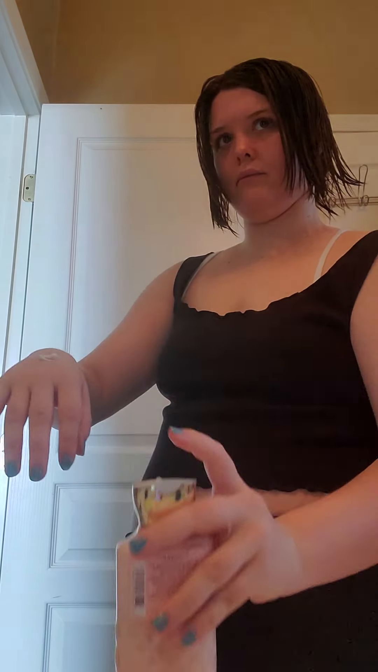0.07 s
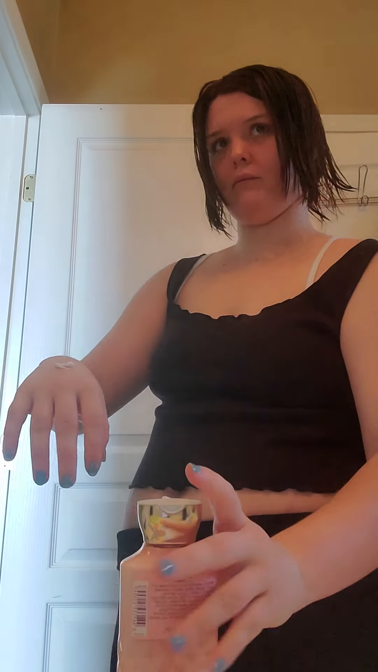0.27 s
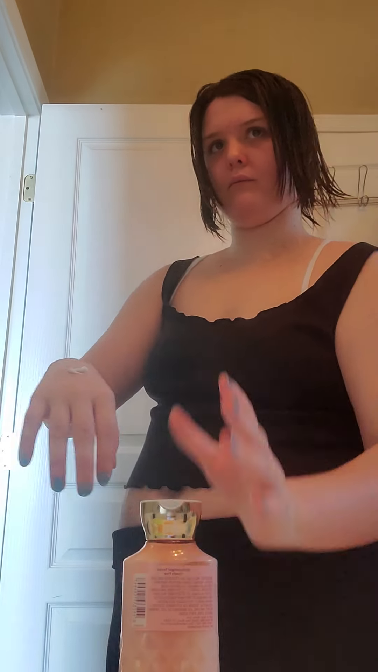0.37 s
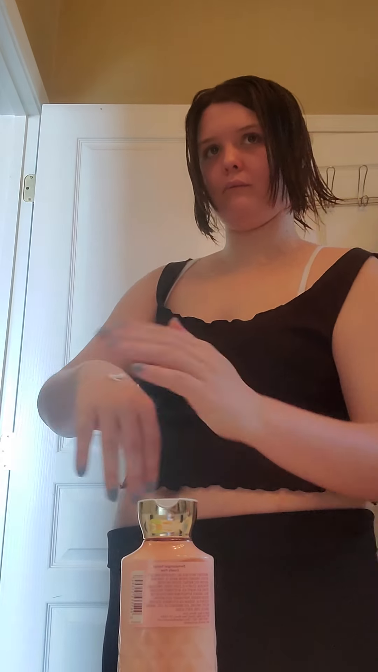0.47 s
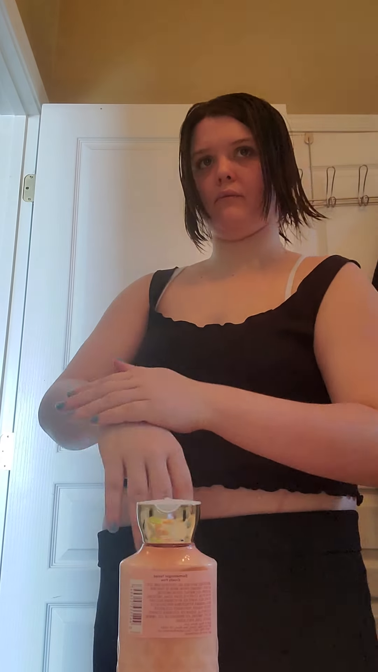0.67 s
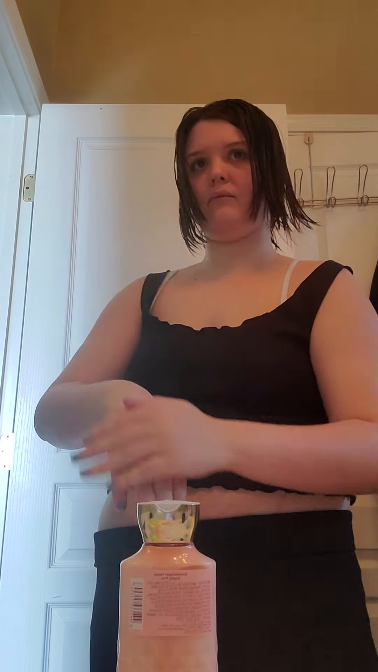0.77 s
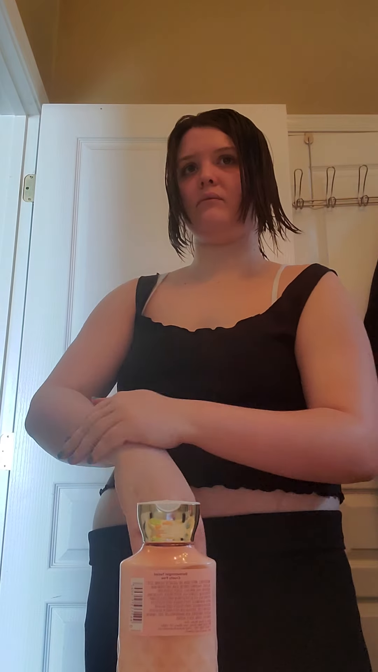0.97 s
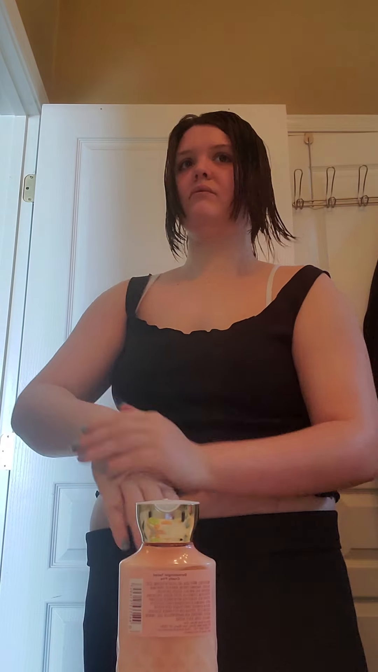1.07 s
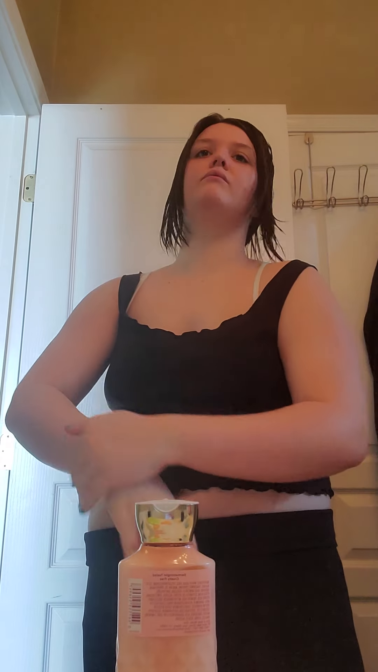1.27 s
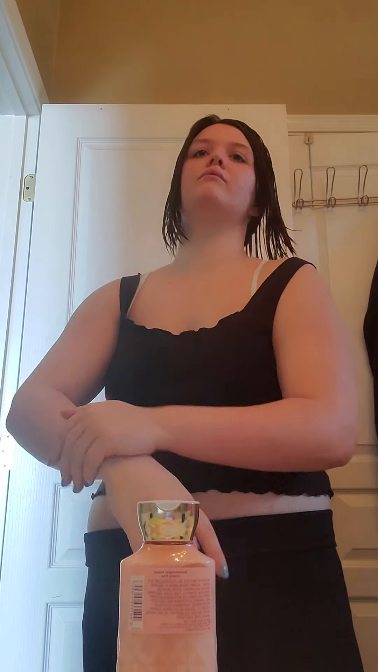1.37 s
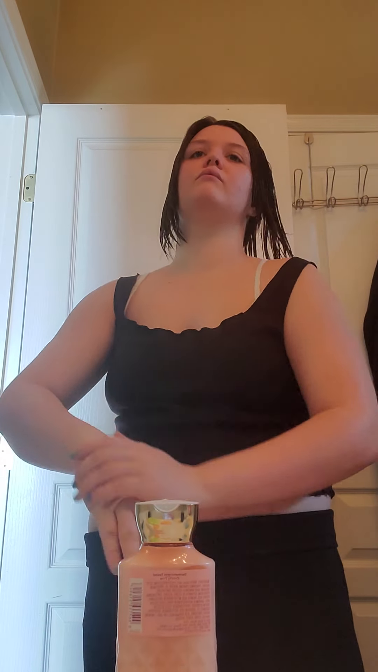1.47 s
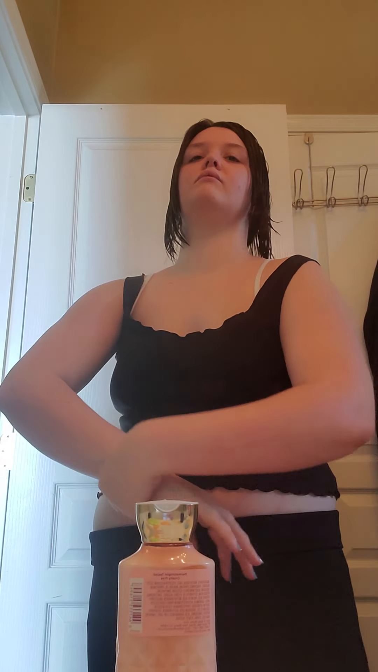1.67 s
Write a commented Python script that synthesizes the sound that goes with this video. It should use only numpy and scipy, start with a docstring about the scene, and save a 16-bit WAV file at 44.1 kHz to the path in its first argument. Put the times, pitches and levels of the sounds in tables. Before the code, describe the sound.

A full plastic bottle lands with a loud hollow clunk on a bathroom counter, then wobbles in softer, quickening knocks while hands rub lotion in short, soft swishes; low hum, small tiled room, close microphone.

```python
"""A low hum, a rumble, hiss and a dying mid-range noise are heard first; they are sines and shaped noise.
Fingers then slip on a full plastic bottle, which is set down on a hollow bathroom counter and rocks from
edge to edge, on the whole ever faster and softer: each landing excites decaying counter modes, a click and
a cabinet thud. Hands rub lotion in short strokes, heard as swelling bands of noise; a short room tail
answers the landings and the smacks of skin."""
import sys
import numpy as np
from scipy import signal
from scipy.fft import rfft, irfft, next_fast_len
from scipy.io import wavfile
from scipy.ndimage import uniform_filter1d, map_coordinates

SR = 44100
rng = np.random.default_rng(int(sys.argv[2]) if len(sys.argv) > 2 else 0)


def wrap_up_sound(samples):
    """Save the sound to the file named by the first command line argument, as 16-bit audio."""
    columns = np.atleast_2d(samples).T
    # keep every value between -1 and 1, then stretch to whole-number steps
    tamed = np.clip(columns, -1, 1)
    steps = np.round(tamed * 32767).astype(np.int16)
    wavfile.write(sys.argv[1], SR, steps)


N = 77175  # samples

# All noise spectra give relative density; the noise is then scaled to rms 1.
# Steady room noise. Each row: frequency in Hz, density in dB per Hz.
AIR_SPECTRUM = [(60, -0.5), (125, -1), (220, -20.5), (450, -15), (1250, -23.5), (1550, -26.5), (2300, -21),
                (4500, -28.5), (7200, -56)]
# Coherence of the background noise. Each row: frequency in Hz, left-right correlation from 0 to 1.
AIR_COHERENCE = [(60, 0.97), (290, 1), (700, 0.052), (3000, 0)]
# Mid-range noise dying away from the start. Each row: frequency in Hz, density in dB per Hz.
FADE_SPECTRUM = [(250, -27), (400, -15), (1200, -2.5), (2400, -9), (7000, -21), (9000, -34)]
# Growing rumble. Each row: frequency in Hz, density in dB per Hz.
RUMBLE_SPECTRUM = [(20, 1.5), (40, 0), (70, 26), (100, -48.5)]
# Decay of the tiled room. Each row: frequency in Hz, time to fall by 60 dB in s.
ROOM_DECAY = [(200, 0.1), (1000, 0.36), (3000, 0.3), (9000, 0.05)]

# Skin sliding on skin. Each row: frequency in Hz, density in dB per Hz.
SKIN_SPECTRUM = [(1200, -30), (2400, -6), (3530, 1), (4430, 0), (5900, 2), (9000, -20), (11700, -39)]
# Finer sheen on top of the skin noise. Each row: frequency in Hz, density in dB per Hz.
SHEEN_SPECTRUM = [(4410, -12), (7500, 4), (8800, -5), (10800, 4.5), (15100, 1.5), (15800, -6)]
# Fingers slipping on the bottle. Each row: frequency in Hz, density in dB per Hz.
SLIDE_SPECTRUM = [(1800, -29.5), (2700, -10.5), (4400, -8), (5400, -48)]
# Coherence of the hand noises. Each row: frequency in Hz, left-right correlation from 0 to 1.
SKIN_COHERENCE = [(1500, .7), (3000, .75), (6000, .5), (12000, .2)]
# Stereo lean of the hands. Each row: frequency in Hz, left minus right in dB.
SKIN_LEAN = [(3000, -1), (15000, -5.5)]
# Strokes of skin on skin. Each row: start in seconds, length in seconds, level in dB, level of the sheen
# in dB, place of the top as a share of the length (held within 0.1 to 0.9).
STROKES_OF_SKIN = [(0.504, 0.16, -66, -101, 0.1), (0.645, 0.14, -54.5, -62.5, 0),
                   (0.833, 0.084, -45.5, -54, 0.46), (0.948, 0.14, -50.5, -57.5, 0.29),
                   (1.132, 0.11, -47.5, -51.5, 0.64), (1.297, 0.13, -51, -58, 0.45),
                   (1.495, 0.17, -55, -57, 0.25), (1.675, 0.33, -56.5, -61, 0.28)]
# Brief soundings of the hollow hand. Each row: start in seconds, length in seconds, level in dB, pitch in Hz.
HAND_HOLLOWS = [(0.863, 0.021, -39, 3400), (0.964, 0.037, -51, 2630), (0.976, 0.058, -54.5, 3570),
                (1.19, 0.014, -46.5, 3600), (1.387, 0.031, -51, 4140), (1.525, 0.025, -47, 3610)]
# Smacks of skin. Each row: start in seconds, starting level of the tone in dB, pitch in Hz.
SKIN_SMACKS = [(.6560, -34, 2840), (0.662, -36, 4940), (1.6319, -34.5, 4500)]

# Modes of the counter top. Each row: frequency in Hz, time to fall by 60 dB in s, then the relative signed
# swing when struck by the flat base, by its first edge and by its second edge.
COUNTER_MODES = [(110, 0.29, 0.27, 0.0142, 0.0167), (114.6, 0.41, -0.34, 0.0069, 0.0075),
                 (122.4, 0.31, -0.11, 0.0082, 0.0041), (159.5, 0.29, -0.17, 0.028, 0.0264),
                 (189.7, 0.49, 0.092, -0.018, -0.087), (203, 0.076, -0.55, 0.14, 0.41),
                 (204, 0.14, 0.43, -0.07, -0.27), (217.75, 0.15, 0.19, -0.073, -0.052),
                 (313.7, 0.11, 0.05, -0.00054, 0.003), (359.4, 0.097, -0.22, 0.012, -0.014),
                 (375, 0.04, 0.43, -0.012, 0.012), (418, 0.25, 0.05, 0.019, 0.006),
                 (430, 0.073, 0.13, 0.036, 0.037), (444.3, 0.2, 0.058, 0.016, 0.0162),
                 (475.4, 0.062, -0.046, 0.032, 0.059), (537.7, 0.034, 0.11, 0.038, 0.073),
                 (619.4, 0.049, -0.039, 0.0116, 0.0081), (683, 0.036, -0.12, -0.00016, 0.015),
                 (964, 0.081, -0.02, 0.0034, -0.002), (1126, 0.015, 0.058, -0.016, 0.046)]
# Landings of the base. Each row: start in seconds, strength in dB, contact time in ms, click level in dB,
# part of the base (0 flat, 1 first edge, 2 second edge).
BOTTLE_LANDINGS = [(0.22, 1, 0.27, -17, 0), (0.4462, 4, 0.79, -44, 1), (.7420, 1.84, 0.11, -33.5, 2),
                   (0.8855, 0.3, 0.092, -37.5, 1), (1.0862, -2, 1.54, -72, 2), (1.202, 1, 3, -48, 1),
                   (1.3503, -4, 2.67, -65, 2), (1.4423, -3.5, 1.17, -83, 1), (1.5587, -9.5, 0.97, -66, 2),
                   (1.6332, -1.5, 4.2, -39, 1), (1.7215, -9, 1.63, -64, 2)]
# Dense modes of the cabinet, heard as a rough thud. Each row: frequency in Hz, density in dB per Hz.
THUD_SPECTRUM = [(25, -13), (65, 11), (130, 0), (270, 3.5), (650, -18.5), (1000, -25), (1600, -53.5)]
# Thud level at 0 dB strength. Each entry: level in dB for the flat base, the first edge, the second edge.
THUD_LEVELS = [-20.5, -43.5, -39]
# Click of the base. Each row: frequency in Hz, density in dB per Hz.
CLICK_SPECTRUM = [(1000, 1), (1780, -9.5), (1980, 3), (2600, -9.5), (3600, -6), (6100, -16), (8000, -34),
                  (11500, -31), (15500, -48)]
# Stereo lean of the counter. Each row: frequency in Hz, left minus right in dB.
COUNTER_LEAN = [(60, -3.5), (180, 0), (400, -4), (1000, -2.5)]

AIR_DB, FADE_DB, FADE_T60_S = -54, -51, 0.69
RUMBLE_START_DB, RUMBLE_GROWS_DB_PER_S = -53.5, 6
HUM_HZ, HUM_START_DB, HUM_FADES_DB_PER_S = 117.9, -50, 3
HUM_WAVER_DB, HUM_WAVER_RAD = 3.5, 0.6
ROOM_DB = -10
LEFT_LAG_S = 0.00008  # left port behind the right

SLIDE_START_S, SLIDE_LONG_S, SLIDE_DB = 0.118, 0.13, -57
ARCH_POWER = 0.63  # exponent of a swell; smaller is fuller
TRAIL_T60_S = 0.14
HOLLOW_WIDTH = 0.087  # relative to its pitch
SMACK_T60_S, SMACK_NOISE = 0.0038, 0.2  # noise rms relative to the tone's amplitude

MODE_SCATTER_DB, RING_RISE_S = 0.3, 0.0025
CHOKE_S = 0.19  # after about this long the ring dies off quickly
THUD_T60_S, THUD_LEAD_S = 0.31, 0.0043  # the lead is both the head start and the rise time
CLICK_T60_S, CLICK_AFTER_S, CLICK_RISE_S = 0.015, 0.0008, 0.001
BOUNCE_S, BOUNCE_DB = 0.0115, -7  # the base chatters once more

FLOOR_HISS_DB = -93.5  # the microphone's own noise
LOW_HZ, TOP_HZ = 52, 15830  # band limits of the microphone


def amp(db):
    """Amplitude ratio: twenty decibels make a factor of ten."""
    return 10 ** (np.asarray(db) / 20)


def unit(x):
    """Normalization: mean power is brought to one."""
    return x / np.sqrt(np.mean(x ** 2) + 1e-20)


def along(points, hz):
    """Interpolation on a logarithmic frequency axis."""
    f, v = np.transpose(points)
    return np.interp(np.log(hz + 1), np.log(f + 1), v)


def wobble(rate):
    """Band-limited fluctuation: a smooth curve runs through random knots, rate of them a second."""
    knots = rng.standard_normal(int(N * rate / SR) + 4)
    return map_coordinates(knots, [np.arange(N) * rate / SR])


def filtered(x, response):
    """Linear filtering: the spectrum is multiplied by a complex response of frequency."""
    size = next_fast_len(x.shape[-1] + 8192)
    hz = np.fft.rfftfreq(size, 1 / SR)
    return irfft(rfft(x, size) * response(hz), size)[..., :x.shape[-1]]


def placed(pair, sides):
    """Interchannel differences: level leans with frequency and the left port lags the right."""
    half = np.array([[.5], [-.5]])

    def response(hz):
        lean = amp(half * along(sides, hz))
        return lean * np.exp(-2j * np.pi * hz * half * LEFT_LAG_S)

    return filtered(pair, response)


def rush(spectrum, alike, patchy_db):
    """Partially coherent noise: rms 1, shaped in frequency, with time-frequency patches of random gain."""
    hz, _, z = signal.stft(rng.standard_normal((2, N)), SR, nperseg=512)
    patches = uniform_filter1d(rng.standard_normal(z.shape[1:]), size=5, axis=0)
    patches = uniform_filter1d(patches, size=6, axis=1)
    z = z * amp(patchy_db * unit(patches) + along(spectrum, hz)[:, None])
    # the correlation of the channels is the cosine of twice this angle
    angle = np.arccos(np.clip(along(alike, hz), -1, 1))[:, None] / 2
    mid, side = z[0] * np.cos(angle), z[1] * np.sin(angle)
    stereo = signal.istft(np.array([mid + side, mid - side]), SR, nperseg=512)[1]
    return unit(stereo[:, :N])


def arch(start, length, top=0.14):
    """Attack and release: a rounded swell peaks at a share of its length and trails exponentially."""
    u = (np.arange(N) / SR - start) / length
    top = np.clip(top, .1, .9)
    slope = np.clip(np.minimum(u / top, (1 - u) / (1 - top)), 0, 1)
    swell = np.sin(np.pi / 2 * slope) ** ARCH_POWER
    keep = amp(-120 / TRAIL_T60_S / SR)  # twice 60 dB, as it smooths the squared swell
    return np.sqrt(signal.lfilter([1 - keep], [1, -keep], swell ** 2))


def room(x):
    """Reverberation: in the tiled room each frequency dies at its own speed."""
    hz, t, z = signal.stft(rng.standard_normal((2, SR // 2)), SR, nperseg=256)
    decay = amp(-60 * t / along(ROOM_DECAY, hz)[:, None])
    tail = signal.istft(z * decay, SR, nperseg=256)[1]
    tail = tail / np.linalg.norm(tail[0])
    delayed = np.pad(x, (260, 0))[None]  # samples before the tail begins
    return amp(ROOM_DB) * signal.fftconvolve(delayed, tail, axes=1)[:, :len(x)]


def hum(t):
    """Modulation: a sinking sine wavers at random in level and phase."""
    level = amp(HUM_START_DB - HUM_FADES_DB_PER_S * t + HUM_WAVER_DB * wobble(8.8))
    phase = 2 * np.pi * HUM_HZ * t + HUM_WAVER_RAD * wobble(7.0)
    return level * np.sqrt(2) * np.sin(phase)


def air():
    """Superposition: room noise, a growing rumble, a hum and an exponentially fading noise add up."""
    t = np.arange(N) / SR
    steady = amp(AIR_DB) * rush(AIR_SPECTRUM, AIR_COHERENCE, patchy_db=1.5)
    fade = amp(FADE_DB - 60 * t / FADE_T60_S) * rush(FADE_SPECTRUM, AIR_COHERENCE, patchy_db=4.5)
    rumble_level = amp(RUMBLE_START_DB + RUMBLE_GROWS_DB_PER_S * t)
    rumble = rumble_level * rush(RUMBLE_SPECTRUM, AIR_COHERENCE, patchy_db=0)
    return steady + rumble + hum(t) + fade


def strokes():
    """Friction noise: sliding skin hisses in swells, with a finer sheen on top."""
    swells = np.array([arch(start, length, top) for start, length, _, _, top in STROKES_OF_SKIN])
    _, _, db, sheen_db, _ = np.transpose(STROKES_OF_SKIN)
    skin = amp(db) @ swells * amp(2.2 * wobble(140))
    skin = skin * rush(SKIN_SPECTRUM, SKIN_COHERENCE, patchy_db=2)
    sheen = amp(sheen_db) @ swells * amp(wobble(150))
    return skin + sheen * rush(SHEEN_SPECTRUM, SKIN_COHERENCE, patchy_db=2.5)


def hollows():
    """Cavity resonance: the cupped hand briefly adds narrow bands of noise."""
    out, w = np.zeros((2, N)), HOLLOW_WIDTH
    for start, length, db, hz in HAND_HOLLOWS:
        band = [(hz * (1 - 2 * w), -40), (hz * (1 - w), 0), (hz * (1 + w), -2), (hz * (1 + 6 * w), -40)]
        out += amp(db) * arch(start, length) * rush(band, SKIN_COHERENCE, patchy_db=-1.5)
    return out


def finger_slide():
    """Friction noise: fingers slip on the bottle in one swell."""
    swell = amp(SLIDE_DB) * arch(SLIDE_START_S, SLIDE_LONG_S)
    return swell * rush(SLIDE_SPECTRUM, SKIN_COHERENCE, patchy_db=2)


def smacks():
    """Impulsive excitation: each smack of skin is a tone with noise, decaying within milliseconds."""
    t, out = np.arange(N) / SR, np.zeros(N)
    crack = SMACK_NOISE * rng.standard_normal(N)
    for start, db, hz in SKIN_SMACKS:
        decay = amp(db - 60 * np.clip(t - start, 0, 1) / SMACK_T60_S) * (t > start)
        out += decay * (np.sin(2 * np.pi * hz * (t - start)) + crack)
    return out


def hands():
    """Superposition: strokes, hollows, slide and smacks add; the room answers the smacks."""
    pats = smacks()
    return placed(strokes() + hollows() + finger_slide() + pats + room(pats), SKIN_LEAN)


def counter_ring(t, strength_db, contact_ms, part):
    """Modal synthesis: a blow starts all modes together, and a longer contact dulls the high ones."""
    hz, t60, *swing = np.transpose(COUNTER_MODES)[:, :, None]
    soft = 1 / (1 + (hz * contact_ms / 1000) ** 2)
    scatter = rng.normal(0, MODE_SCATTER_DB, hz.shape)
    level = swing[round(part)] * amp(strength_db + scatter - 60 * t / t60)
    modes = (soft * level * np.sin(2 * np.pi * hz * t)).sum(0)
    return modes * (1 - np.exp(-(t / RING_RISE_S) ** 2)) * np.exp(-(t / CHOKE_S) ** 4)


def base_click(t, click_db):
    """Contact noise: the base gives a decaying noise burst and chatters once more."""
    since = np.clip(t - CLICK_AFTER_S - np.array([[0], [BOUNCE_S]]), 0, 1)
    bursts = amp(-60 * since / CLICK_T60_S) * (1 - np.exp(-(since / CLICK_RISE_S) ** 2))
    envelope = amp([click_db, click_db + BOUNCE_DB]) @ bursts
    noise = rng.standard_normal((2, len(t)))
    return envelope * unit(filtered(noise, lambda f: amp(along(CLICK_SPECTRUM, f))))


def cabinet_thud(t, strength_db, part):
    """Modal overlap: the cabinet's dense modes merge into decaying low noise."""
    rough = unit(filtered(rng.standard_normal(len(t)), lambda f: amp(along(THUD_SPECTRUM, f))))
    decay = amp(THUD_LEVELS[round(part)] + strength_db - 60 * t / THUD_T60_S)
    return decay * (1 - np.exp(-(t / THUD_LEAD_S) ** 2)) * rough


def bottle():
    """Impact sound: each landing sums ring, click and thud, and the room answers ring and click."""
    out, t = np.zeros((2, N + SR)), np.arange(SR // 2) / SR
    for start, strength_db, contact_ms, click_db, part in BOTTLE_LANDINGS:
        ring = counter_ring(t, strength_db, contact_ms, part)
        click = base_click(t, click_db)
        thud = cabinet_thud(t, strength_db, part)
        high = filtered(ring, lambda f: f ** 2 / (f ** 2 + 400 ** 2))  # the room gets little bass
        echo = room(click[0] + amp(3.5) * high)
        # the thud swells just ahead of the ring
        out[:, round((start - THUD_LEAD_S) * SR):][:, :len(t)] += thud
        out[:, round(start * SR):][:, :len(t)] += ring + click + echo
    return placed(out[:, :N], COUNTER_LEAN)


def scene():
    """Superposition: background, hands and bottle add linearly."""
    return air() + hands() + bottle()


def record(dry):
    """Transduction: the microphone hisses unevenly, rolls off deep bass and passes nothing above its limit."""
    hiss_spectrum = [(3000, -20), (5500, 0), (8500, -9), (12500, 0)]  # Hz, dB per Hz
    hiss = amp(FLOOR_HISS_DB + 2 * wobble(15)) * rush(hiss_spectrum, [(3000, 0)], patchy_db=2)
    return filtered(dry + hiss, lambda hz: (1j * hz / (LOW_HZ + 1j * hz)) ** 2 * (hz < TOP_HZ))


dry = scene()
out = record(dry)
wrap_up_sound(out)
```